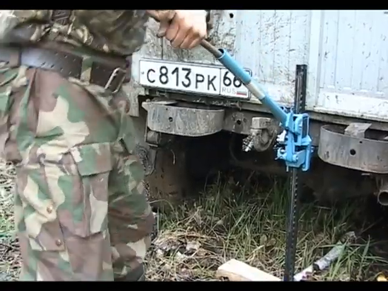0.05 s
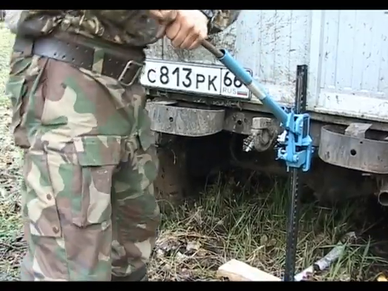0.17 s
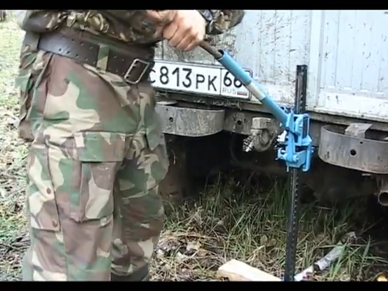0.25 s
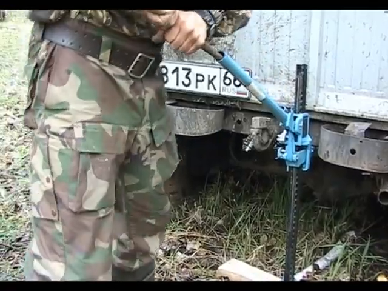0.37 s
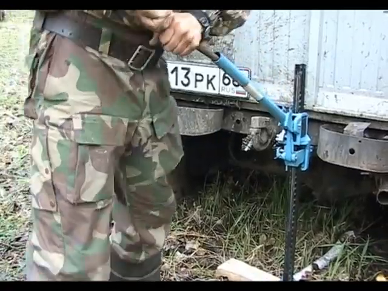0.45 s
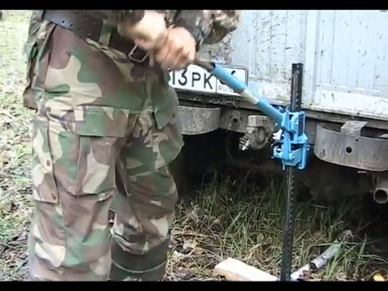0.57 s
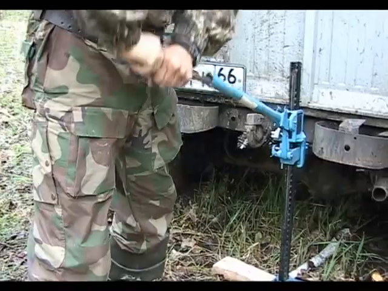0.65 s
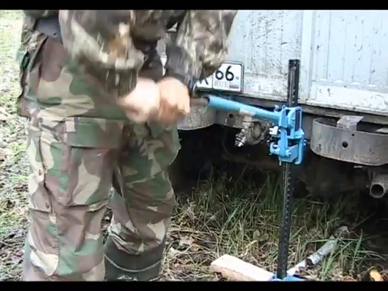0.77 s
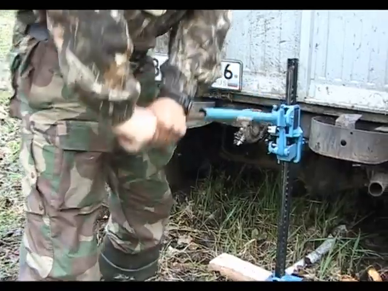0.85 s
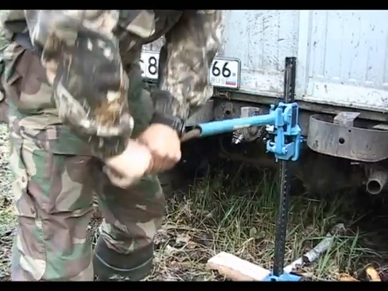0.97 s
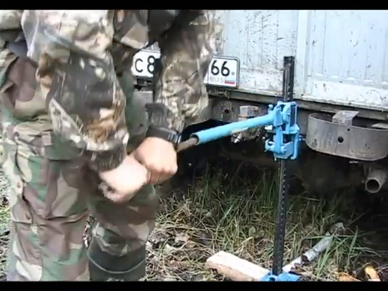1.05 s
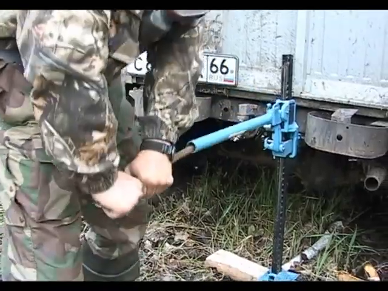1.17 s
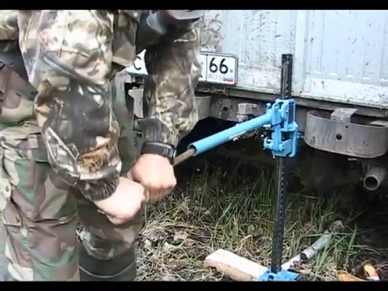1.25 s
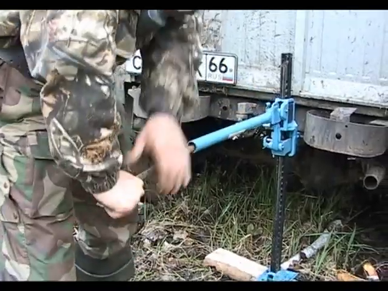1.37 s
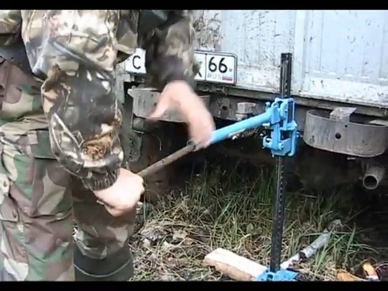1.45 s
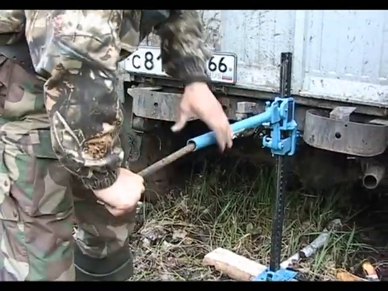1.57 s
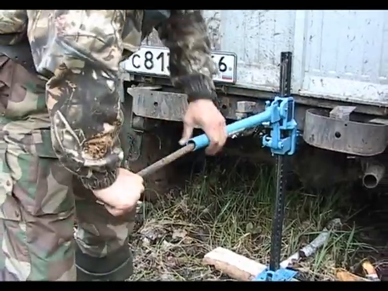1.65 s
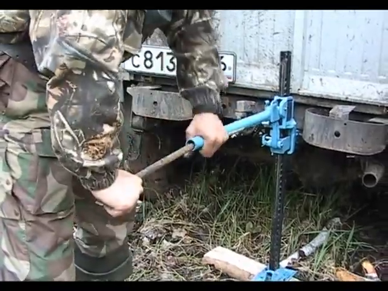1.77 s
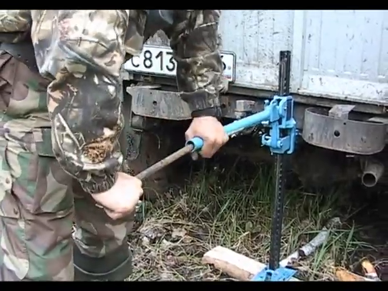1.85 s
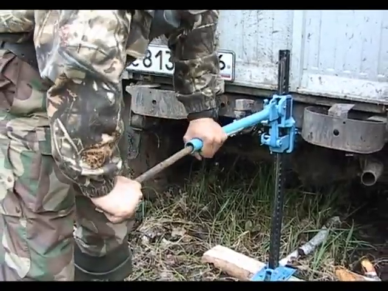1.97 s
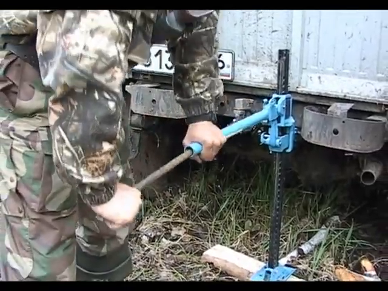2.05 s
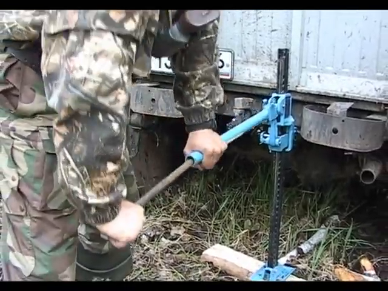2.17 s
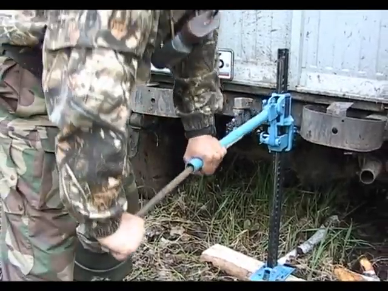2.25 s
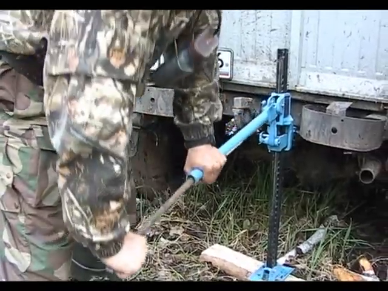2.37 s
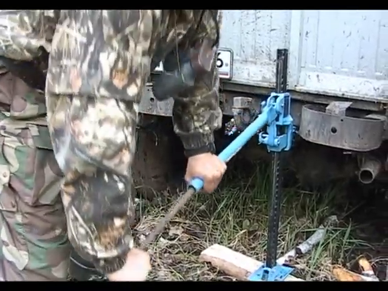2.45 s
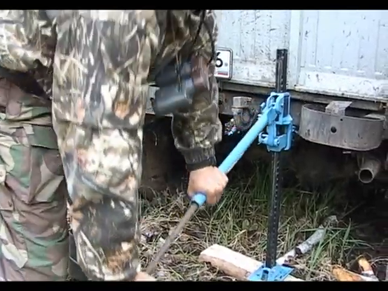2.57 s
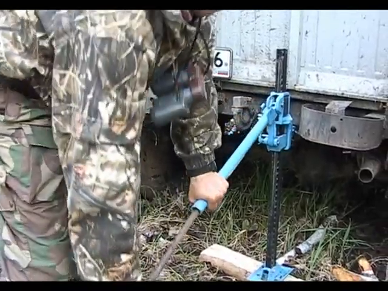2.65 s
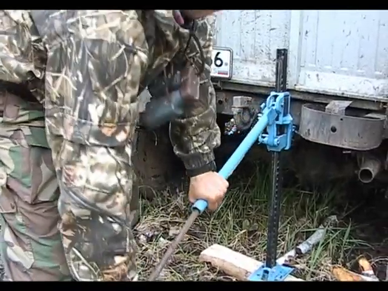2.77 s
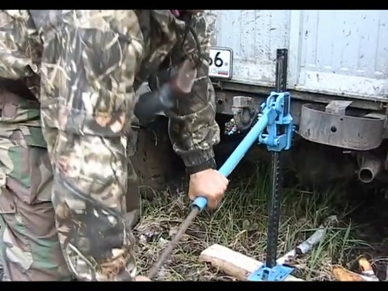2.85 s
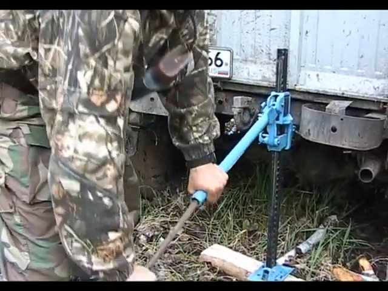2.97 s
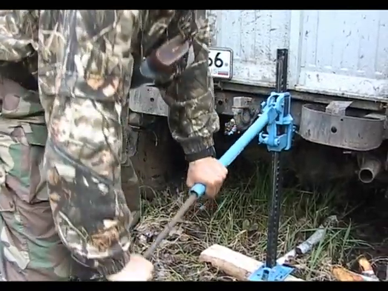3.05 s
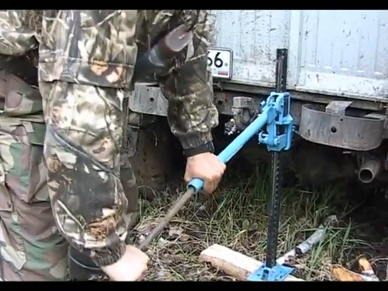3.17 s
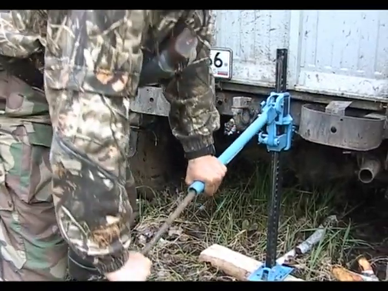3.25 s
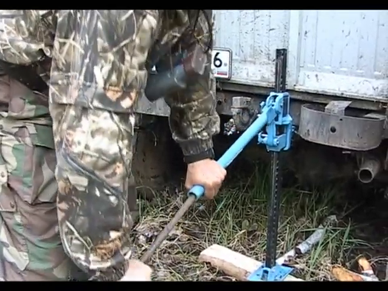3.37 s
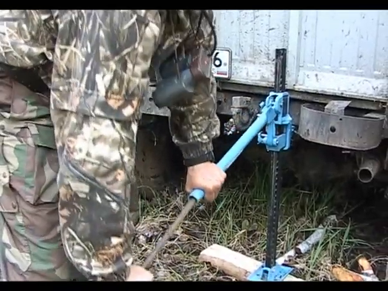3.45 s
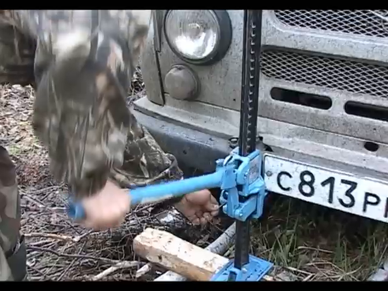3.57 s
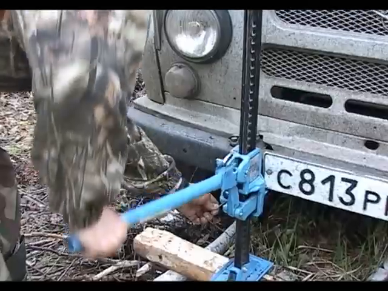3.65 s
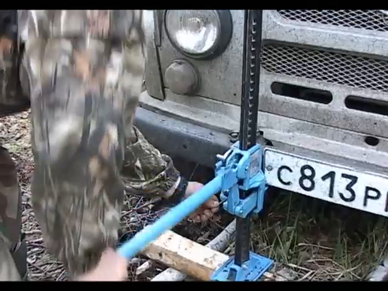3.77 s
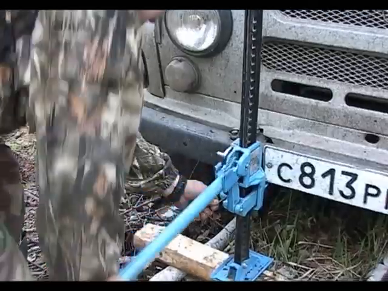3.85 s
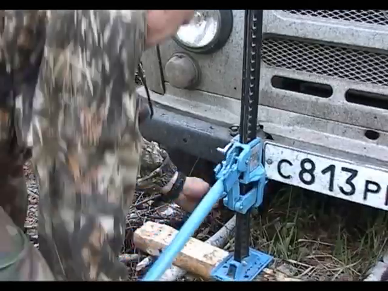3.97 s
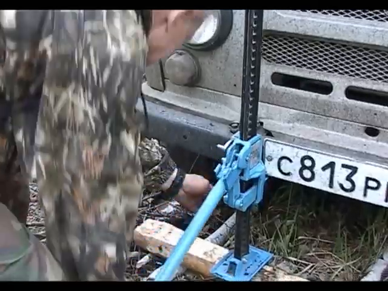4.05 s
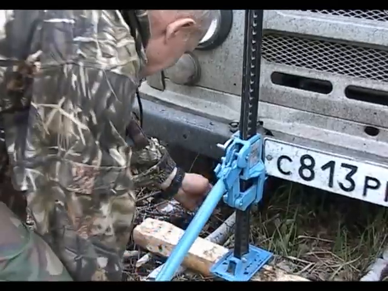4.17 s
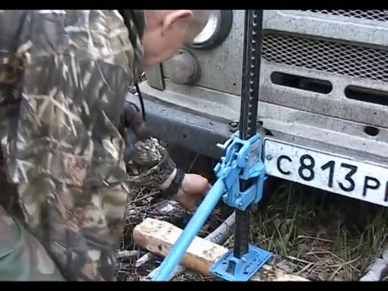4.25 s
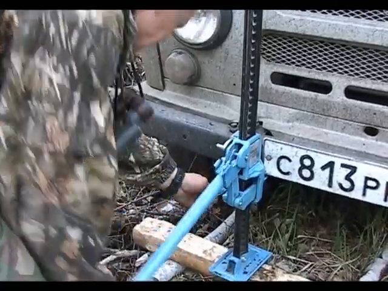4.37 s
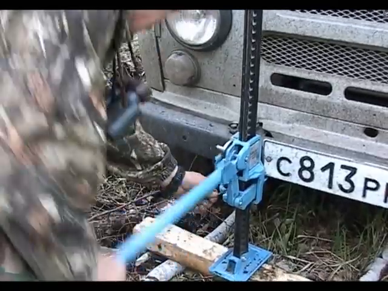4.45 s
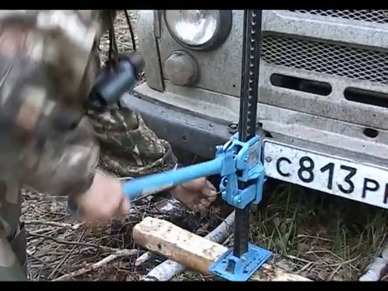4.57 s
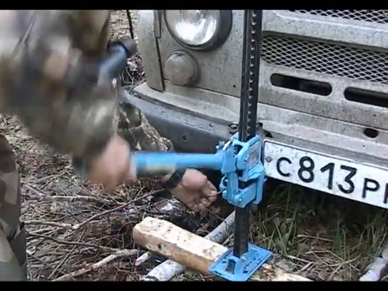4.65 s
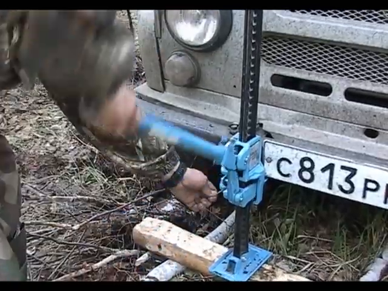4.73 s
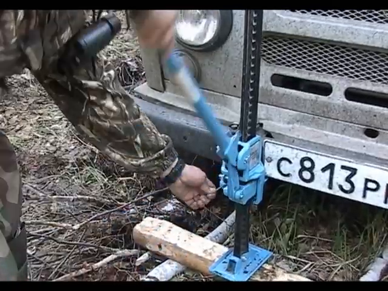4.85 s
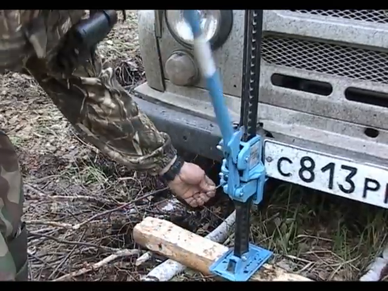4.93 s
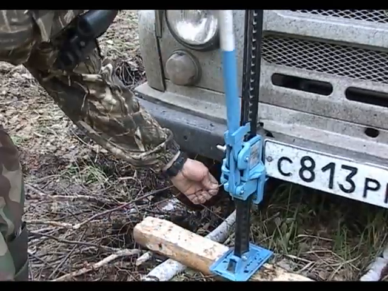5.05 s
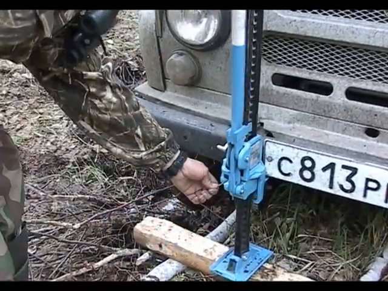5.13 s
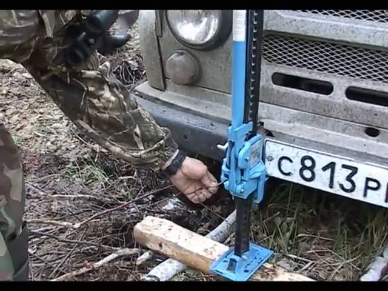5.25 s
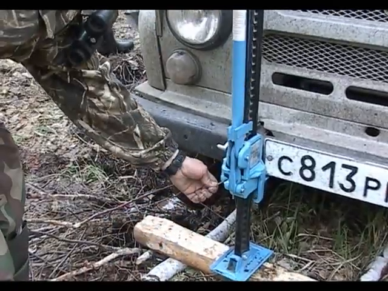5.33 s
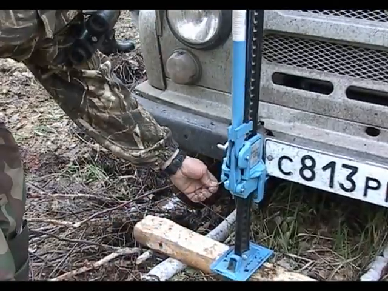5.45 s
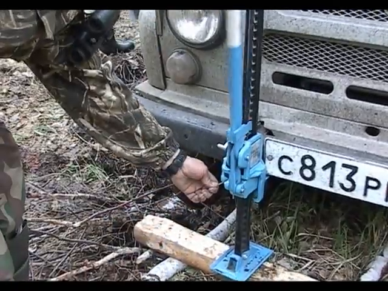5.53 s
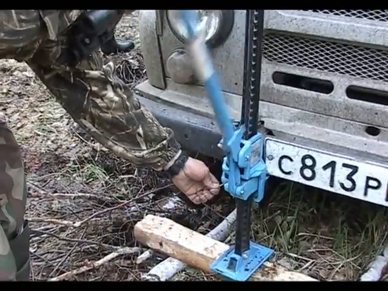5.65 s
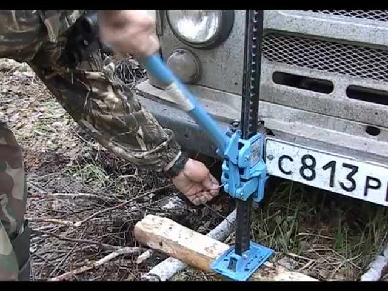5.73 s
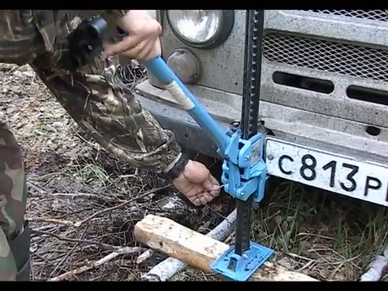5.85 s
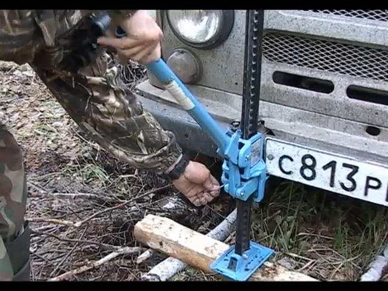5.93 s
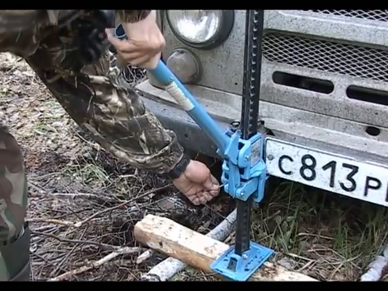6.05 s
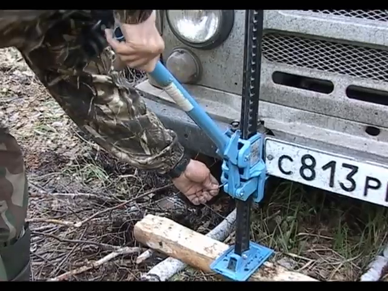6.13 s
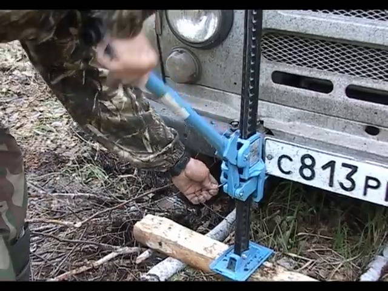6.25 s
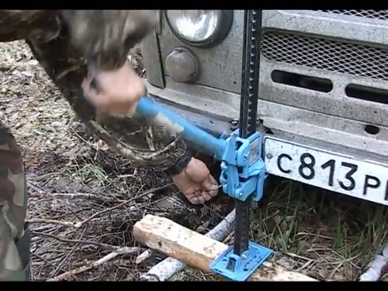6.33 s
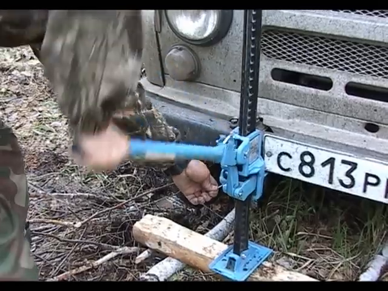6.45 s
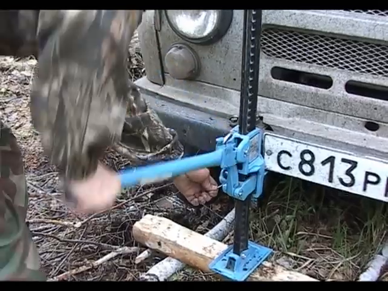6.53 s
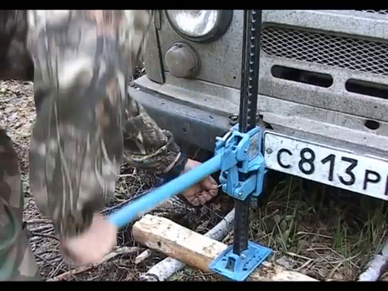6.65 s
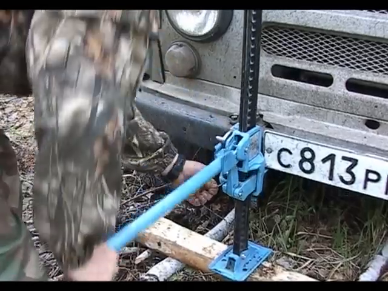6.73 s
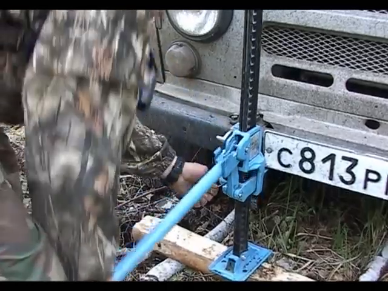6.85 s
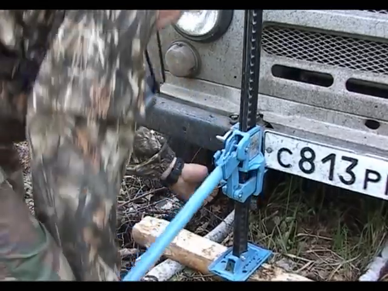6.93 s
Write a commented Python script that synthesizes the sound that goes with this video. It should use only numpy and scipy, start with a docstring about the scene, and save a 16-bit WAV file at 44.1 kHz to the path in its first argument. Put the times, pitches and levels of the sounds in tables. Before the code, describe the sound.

Close by, in a quiet outdoor spot, soft rustling and scraping of heavy fabric comes first, dotted with small ticks. Then a steel lifting jack is worked by its handle, its pins snapping into the rack in sharp, uneven clacks with small rattles and a short metallic ring. The hardest knocks overload the microphone slightly. Distant birds are barely audible over a light hiss.

```python
"""Pumping a steel rack jack

Beside a truck at the edge of a wood, stiff clothes swish and crackle by friction as the handle is
leaned on. Then pins snap into the rack and the handle knocks in its socket: each impact excites the
modes of the steel, and the rack bar and the truck's sheet metal ring on. Far birds whistle over a
quiet hiss. The loudest knocks overload the input."""
import sys
import numpy as np
from scipy import signal
from scipy.fft import rfft, irfft
from scipy.io import wavfile
from scipy.ndimage import uniform_filter1d

SR = 44100
rng = np.random.default_rng(int(sys.argv[2]) if len(sys.argv) > 2 else 0)


def materialize(psi):
    """Save the field psi as 16-bit PCM at rate SR to the path in sys.argv[1].

    A 1-D psi becomes a single channel; in a 2-D psi each row is a channel.
    """
    bounded = np.clip(np.atleast_2d(psi).T, -1, 1)
    quanta = np.round(bounded * 32767).astype(np.int16)
    wavfile.write(sys.argv[1], SR, quanta)


N = 308418

# movements of body, clothes and boots: t/s, length/s, swish level/dB, rub level/dB
MOVEMENTS = [(0, 0.21, -53.5, -53), (0.096, 0.27, -38.5, -66), (0.255, 0.25, -45, -59),
             (0.59, 0.16, -50.5, -76), (0.708, 0.63, -49, -58.5), (1.313, 0.76, -43.5, -50.5),
             (1.515, 0.13, -43, -40.5), (1.62, 0.13, -36.5, -42.5), (1.676, 0.26, -42, -45),
             (2.528, 0.51, -45, -78), (2.713, 0.35, -46.5, -48), (3.016, 0.33, -48, -55.5),
             (3.314, 0.19, -51, -78), (4.827, 0.54, -58, -44.5), (5.341, 0.14, -51, -60),
             (5.534, 0.25, -59, -44)]
# hands sliding on the handle: t/s, length/s, level/dB
HAND_SLIDES = [(0.25, 0.39, -47), (1.11, 0.12, -43), (1.18, 0.19, -49.5), (2.815, 0.14, -44.5),
               (3.41, 0.17, -48.5), (5.338, 0.63, -51)]
# background hiss: t/s, level/dB
HISS_LEVEL = [(0, -49), (1.3, -55.5), (3.55, -54), (3.7, -56), (5.7, -64), (6.99, -59)]
# spectra of the four friction noises: f/Hz, relative density/dB
SWISH_SPECTRUM = [(2060, -8.5), (3500, -0.5), (6130, 0.5), (8350, 5), (13400, -4), (15600, -14),
                  (16300, -40)]
SCRAPE_SPECTRUM = [(700, 1), (1100, 1), (2000, 2.5), (3500, -3.5), (5000, -4), (7000, -14)]
RUB_SPECTRUM = [(25, -51), (60, -2), (120, -20.5), (220, 0), (330, -3), (430, -12.5), (580, 4), (750, -31),
                (1000, 0), (1500, -78)]
SLIDE_SPECTRUM = [(600, -4.5), (1100, 0), (2300, -2), (3300, -8.5), (6000, -13.5)]
# likeness of left and right noise: f/Hz, correlation
NOISE_CORRELATION = [(60, -1.44), (180, 1), (550, 0.26), (1650, 0.38), (4970, 0.42), (15000, 0.71)]
# direction of the clothes: t/s, left over right/dB
CLOTHES_BALANCE = [(0, -2.5), (3.5, -2), (3.7, 0.5), (6.99, -1)]
# snaps of cloth and twigs: t/s, relative level/dB, centre f/Hz
CLEAR_SNAPS = [(0.103, -20.5, 10600), (0.183, -19, 8500), (0.203, -25, 4500), (0.246, -24, 8500),
               (0.312, -15, 7800), (0.318, -22, 10000), (0.408, -19, 3950), (0.429, -21, 696),
               (0.468, -27, 8500), (0.5, -26, 7950), (0.52, -25, 7800), (0.82, -26, 3220),
               (0.944, -27, 1610), (1.141, -22.5, 2200), (1.151, -20, 1360), (1.209, -24, 1690),
               (1.444, -18, 8500), (1.455, -20, 10000), (1.475, -25, 8300), (1.668, -10, 7500),
               (1.812, -16.5, 1900), (1.814, -11, 5500), (1.836, -26, 412), (2.555, -24.5, 7500),
               (2.601, -20.5, 7040), (2.614, -16.5, 8000), (2.669, -20.5, 7340), (2.82, -29.5, 220),
               (2.915, -25, 400), (3.085, -31, 220), (3.2107, -23, 8510), (3.3335, -26, 8000),
               (3.3609, -26, 8210), (3.374, -22.5, 8500)]
# far birds, one contour for each whistle: t/s, f/Hz, level/dB
WHISTLES = [
    [(2.17, 2130, -79), (2.46, 2860, -53)],
    [(4.84, 4270, -69), (4.9, 4330, -53)],
    [(6.22, 4400, -61), (6.37, 4150, -73)],
]
# the load shifting on the jack's foot: t/s, peak level/dB, body near 1 kHz/dB, favoured f/Hz
FOOT_THUMPS = [(3.6304, -31.5, 4.5, 210), (4.131, -28.5, -3, 318), (4.92, -30.5, -4, 244),
               (5.6803, -32.5, 12, 244), (6.041, -40, -27, 334), (6.0925, -43, -26, 300),
               (6.1948, -41.5, 5, 380), (6.2368, -40, 0, 250)]
# pins and handle: t/s, peak level/dB, body near 1 kHz/dB, brightness near 4 kHz/dB,
# rattle decay time/ms, favoured f/Hz
STEEL_KNOCKS = [(3.6644, -29, -8, -4.5, 2.5, 3850), (3.841, -23, -4.5, 3, 1.3, 980),
                (3.874, -22, -13, 2, 6.7, 2330), (3.8809, -3.5, -11.5, 4, 1.9, 3760),
                (3.888, -12.5, -5, 2.5, 7.4, 2290), (4.129, -27.5, 4.5, -15, 2, 970),
                (4.514, -25.5, -5, -1.5, 2.3, 3800), (4.5574, -4, 2, -3, 2, 3720),
                (4.5687, -12.5, 15, 5.5, 4, 4860), (4.5931, -20, 22, 9, 7.2, 2230),
                (4.618, -21, 0.5, 1, 7.1, 1240), (4.649, -23.5, 11.5, -17, 4.4, 1670),
                (4.6905, -29.5, 23.5, -10, 1, 1370), (4.7524, -31, 13, 2.5, 12, 1920),
                (4.78, -14, -2.5, -6.5, 1.6, 940), (4.9286, -25.5, 12.5, 1.5, 8.4, 1750),
                (5.0211, -23, -3, -7, 4, 1390), (5.0308, -23.5, -7, 0.5, 2.7, 4860),
                (5.0863, -22.5, 4, 1, 7, 2950), (5.0955, -18, -0.5, -7, 6.9, 1330),
                (5.154, -37.5, 1, 13.5, 3.5, 1630), (5.176, -29, 22, -5, 3, 950),
                (5.236, -24.5, 1, -5.5, 3.4, 3920), (5.2673, -1, 0, -1, 1.1, 2790),
                (5.275, -18.5, 2, 1, 3.1, 3880), (5.2965, -18.5, 12.5, -21, 14, 1430),
                (5.489, -41, -13, 7, 1.8, 2010), (5.534, -26.5, 4, 2.5, 1.4, 7500),
                (5.5766, -27.5, 10.5, -4.5, 7.8, 3950), (5.603, -27.5, 7, -8, 2.3, 606),
                (5.6537, -25.5, -1, -32, 4.9, 1010), (5.726, -18, 5.5, 0, 2.5, 4170),
                (5.728, -22, -4, 3.5, 3.5, 4950), (5.7442, -25, 17, 9.5, 4.2, 1810),
                (5.754, -29.5, -8, 14, 9, 6250), (5.7793, -16.5, -1.5, 3, 12, 860),
                (5.8024, -7, 7.5, -1.5, 5.6, 1860), (5.816, -22.5, -1, 5.5, 2.9, 3830),
                (5.8946, -30, 21, -19, 1.7, 1010), (6.412, -34.5, 11.5, -13, 2.6, 1930),
                (6.606, -34.5, -8, 4, 5.1, 2170), (6.6134, -29, -4, -2.5, 3.4, 3900),
                (6.802, -28.5, -2, -3, 8.1, 1670), (6.813, -13.5, -4.5, 3.5, 6.4, 7070),
                (6.8247, -3, -8.5, 3, 1.9, 3740), (6.839, -17.5, 3, -1, 8.2, 2300)]
# clearest modes of jack and handle: f/Hz, relative level/dB, T60/s
CLEAR_MODES = [(113.6, 1, 0.24), (255.8, 1.5, 0.3), (509, -2.5, 0.32), (575.5, 10.5, 0.16), (674, 9, 0.058),
               (877, 5.5, 0.095), (955, 6, 0.052), (1314, 0.5, 0.092), (1486, -4.5, 0.16),
               (1840, 12, 0.037), (2003, -4.5, 0.14), (2586, 4, 0.058), (2750, 5.5, 0.025),
               (3744, 12, 0.019), (4080, 6, 0.051), (4840, -5, 0.096), (7120, 3, 0.055)]
# the dense modes between them: f/Hz, relative level/dB
DENSE_LEVEL = [(150, -10), (500, -4), (2000, -1), (4000, -3), (8000, 2.5), (16000, -8)]
# their typical decay: f/Hz, T60/s
DENSE_DECAY = [(200, 0.17), (700, 0.03), (2000, 0.042), (5000, 0.026), (14000, 0.041)]
# modes of the rack bar: f/Hz, gain/dB, T60 before the fade-out/s
BAR_MODES = [(1949, -80, 2.5), (2401, -82, 2), (2552, -78, 2.5), (3898, -88, 1.5), (4660, -84, .6),
             (7052, -86, 1.6), (7348, -82, 1.6)]
# reverberation of truck body and trees: f/Hz, T60/s
PANEL_DECAY = [(150, 1), (600, 0.4), (2000, 0.37), (5000, 0.32), (12000, 0.36)]

SCRAPE_FLOOR_DB, RUB_FLOOR_DB, SCRAPE_RE_SWISH_DB = -53.5, -56, -4.5
CRACKLES_PER_S, CRACKLE_DB = 180, -10
TUBE_SPACING_HZ, TUBE_RIPPLE_DB = 298, 5  # the hollow handle favours evenly spaced bands
TICK_COUNT, TICK_OVER_DB, TICK_SPREAD_DB = 260, 8, 3.5
TICK_S, SNAP_S, SNAP_CYCLES = 0.001, 0.0038, 3.3  # decay time: a base time plus a few periods
BASS_DB, BASS_PER_BODY, AIR_PER_BODY = -6.5, 0.93, 0.43  # more body: more bass, less top treble
TOP_DB, TOP_PER_BRIGHT, TOP_PER_PEAK = -1, 2.08, 0.3  # the highest modes follow brightness and force
THUMP_BASS_DB, THUMP_BRIGHT_DB, THUMP_MS = 9.5, 3, 2.2
RING_DB, RING_PER_PEAK, RING_WIDTH_HZ = 3.5, -0.42, 100  # favoured resonance; half-width at 1 kHz
PARTNER_DB, T60_SPREAD = -6.5, 0.28
PANELS_DB, PANELS_CORRELATION = -17, 0.73
OVERLOAD, SLOPE_LOSS = 0.35, [[0.2], [0.98]]  # knee; slope lost on positive peaks, left and right
CUTOFF_HZ = 15900


def gain_of(db):
    """Amplitude ratio of a level in decibels."""
    return 10 ** (np.asarray(db) / 20)


def unit_rms(x):
    """Normalisation to unit mean power."""
    return x / np.sqrt(np.mean(x ** 2) + 1e-20)


def curve_at(points, hz):
    """Interpolation on a logarithmic frequency axis."""
    f, value = np.transpose(points)
    return np.interp(np.log(hz + 1), np.log(f + 1), value)


def place(mix, start_s, sound, pan_db):
    """Adds a sound whose left-right level difference gives its direction."""
    part = mix[:, round(start_s * SR):][:, :sound.shape[-1]]
    part += gain_of([[pan_db / 2], [-pan_db / 2]]) * sound[..., :part.shape[1]]


def swell_power(rows):
    """Incoherent sources add in power; each rises quickly and fades more slowly."""
    t = np.arange(N) / SR
    return sum(gain_of(db) ** 2 * np.sin(np.pi * np.clip((t - s) / length, 0, 1) ** 0.69) ** 2
               for s, length, db in rows)


def friction_noise(spectrum, patchy_db, flicker_db):
    """Partly coherent stereo noise, modulated by drifting patches and a flicker common to all bands."""
    frames, hz = N // 128 + 5, np.fft.rfftfreq(512, 1 / SR)
    a, b, c, d, patches = rng.standard_normal((frames, 257, 5)).T
    patches = unit_rms(uniform_filter1d(uniform_filter1d(patches, 8, 0), 12, 1))
    flicker = unit_rms(uniform_filter1d(rng.standard_normal(frames), 3))
    alike = np.clip(curve_at(NOISE_CORRELATION, hz), -1, 1)[:, None]
    left = a + 1j * b
    bands = np.array([left, alike * left + np.sqrt(1 - alike ** 2) * (c + 1j * d)])
    bands *= gain_of(curve_at(spectrum, hz)[:, None] + patchy_db * patches + flicker_db * flicker)
    return unit_rms(signal.istft(bands, nperseg=512, noverlap=384)[1][:, :N])


def clothes():
    """Friction of cloth and hands radiates noise that swells over a background with each movement."""
    t = np.arange(N) / SR
    moving = swell_power([(s, length, db) for s, length, db, _ in MOVEMENTS])
    rubbing = swell_power([(s, length, db) for s, length, _, db in MOVEMENTS])
    swish = np.sqrt(gain_of(np.interp(t, *np.transpose(HISS_LEVEL))) ** 2 + moving)
    scrape = np.sqrt(gain_of(SCRAPE_FLOOR_DB) ** 2 + gain_of(SCRAPE_RE_SWISH_DB) ** 2 * moving)
    rub = np.sqrt(gain_of(RUB_FLOOR_DB) ** 2 + rubbing)
    clicks = gain_of(3.7 * np.minimum(rng.exponential(1, N), 4)) * (rng.random(N) < CRACKLES_PER_S / SR)
    crackle = unit_rms(signal.oaconvolve(clicks, gain_of(-60 * t[:800] / 0.006))[:N])  # T60 of 6 ms
    grain = unit_rms(1 + gain_of(CRACKLE_DB) * crackle)
    f = np.arange(300, 6000, 40)
    tube_db = curve_at(SLIDE_SPECTRUM, f) - TUBE_RIPPLE_DB * np.cos(2 * np.pi * f / TUBE_SPACING_HZ)
    mix = swish * grain * friction_noise(SWISH_SPECTRUM, patchy_db=2.94, flicker_db=0.72)
    mix += scrape * grain ** 0.16 * friction_noise(SCRAPE_SPECTRUM, 2.54, 0.67)
    mix += rub * friction_noise(RUB_SPECTRUM, 0.34, 1.0)
    mix += np.sqrt(swell_power(HAND_SLIDES)) * grain * friction_noise(np.transpose([f, tube_db]), 1.4, 1.8)
    mix += snaps(swish)
    thin = signal.lfilter(*signal.butter(2, 110, "high", fs=SR), mix)  # small things make no deep bass
    lean_db = np.interp(t, *np.transpose(CLOTHES_BALANCE)) / 2
    return thin * gain_of([lean_db, -lean_db])


def snaps(swish):
    """Transients of cloth and twigs are damped noise bands; small ticks crowd where the swish is loud."""
    out, t = np.zeros((2, N)), np.arange(1024) / SR
    f = np.fft.rfftfreq(1024, 1 / SR) + 1
    when, pitch, rarity = rng.random((TICK_COUNT, 3)).T
    at = np.searchsorted(np.cumsum(swish) / swish.sum(), when).clip(0, N - 1)
    tick_db = 20 * np.log10(swish[at]) + TICK_OVER_DB - TICK_SPREAD_DB * np.log(rarity + 0.0012)
    rows = np.vstack([np.transpose([at / SR, tick_db, 3500 * 3.2 ** pitch]), CLEAR_SNAPS])
    decays = np.repeat([TICK_S, SNAP_S], [TICK_COUNT, len(CLEAR_SNAPS)]) + SNAP_CYCLES / rows[:, 2]
    for (s, db, hz), decay_s, noise in zip(rows, decays, rng.standard_normal((len(rows), 1024))):
        band_db = -15 * min(hz / 2500, 1) * np.log2(f / hz) ** 2  # low snaps span more octaves
        band = unit_rms(irfft(rfft(noise) * gain_of(band_db)))
        burst = band * np.exp(-t / decay_s) * np.minimum(t / 0.0003, 1)
        place(out, s, gain_of(db) * 0.2 * burst, pan_db=-1.5)
    return out


def birds():
    """A whistle is a gliding pure tone; random frequency modulation makes it waver."""
    out = np.zeros((2, N))
    for contour in WHISTLES:
        s, hz, db = np.transpose(contour)
        t = np.arange(s[0], s[-1], 1 / SR)
        waver = 1 + 0.41 * uniform_filter1d(rng.standard_normal(len(t)), 300)
        tone = np.sin(2 * np.pi * np.cumsum(np.interp(t, s, hz) * waver) / SR)
        envelope = gain_of(np.interp(t, s, db)) * signal.windows.tukey(len(t), 0.3)
        place(out, s[0], envelope * tone, pan_db=0)
    return out


def impacts():
    """Harder impacts excite higher modes: knocks and thumps with their levels in four spectral ranges."""
    knocks = [(s, db, BASS_DB + BASS_PER_BODY * body, body, bright,
               TOP_DB + TOP_PER_BRIGHT * bright + TOP_PER_PEAK * db, ms, hz)
              for s, db, body, bright, ms, hz in STEEL_KNOCKS]
    thumps = [(s, db, THUMP_BASS_DB, body, THUMP_BRIGHT_DB,
               THUMP_BRIGHT_DB + TOP_PER_PEAK * db, THUMP_MS, hz)
              for s, db, body, hz in FOOT_THUMPS]
    return knocks + thumps


def steel_modes(t, dense_count):
    """Normal modes are damped sinusoids; loose parts split each clear mode in three, so it beats."""
    dense_hz = np.geomspace(150, 16000, dense_count) * rng.uniform(1.0, 1.01, dense_count)
    dense_t60 = curve_at(DENSE_DECAY, dense_hz) * np.exp(T60_SPREAD * rng.standard_normal(dense_count))
    dense = np.transpose([dense_hz, curve_at(DENSE_LEVEL, dense_hz), dense_t60])
    split = [np.multiply(CLEAR_MODES, [ratio, 1, 1]) + [0, db, 0]
             for ratio, db in ((1, 0.0062), (0.975, PARTNER_DB), (1.022, PARTNER_DB))]
    hz, db, t60 = np.vstack([dense, *split]).T[:, :, None]
    return gain_of(db - 60 * t / t60) * np.sin(2 * np.pi * hz * t)


def rattle(t, noise, decay_ms, peak_db):
    """The contact force is a decaying run of uneven small impacts whose treble ends sooner."""
    contacts = noise * abs(noise)
    fade = np.exp(-t * 1000 / decay_ms)
    dull = uniform_filter1d(contacts, 5)
    force = dull * fade + (contacts - dull) * fade ** 1.3
    force[30] = max(13.5 + peak_db / 4, 0)  # a hard blow lands one sharp contact almost at once
    return force


def jack():
    """Modal superposition: each rattle drives the modes of the steel with a new set of weights."""
    out, size, dense_count = np.zeros((2, N)), 16384, 300
    t, f = np.arange(size // 2) / SR, np.fft.rfftfreq(size, 1 / SR)
    modes, blows = steel_modes(t, dense_count), impacts()
    weights = rng.standard_normal((len(blows), len(modes)))
    clear = weights[:, dense_count:]
    weights[:, dense_count:] = np.sign(clear) * (0.45 + 0.5 * abs(clear))  # clear modes always sound
    mean_power = uniform_filter1d((abs(rfft(modes, size)) ** 2).sum(0), 90)
    noises = rng.standard_normal((len(blows), len(t)))
    for blow, response, noise in zip(blows, weights @ modes, noises):
        s, peak_db, bass, body, bright, top, decay_ms, ring_hz = blow
        spectrum = rfft(response, size) * rfft(rattle(t, noise, decay_ms, peak_db), size)
        # chance sets the fine detail only
        spectrum *= np.sqrt(mean_power / uniform_filter1d(abs(spectrum) ** 2, 90))
        # the place struck favours one resonance, more so in light knocks
        detuning = (f - ring_hz) / (RING_WIDTH_HZ * np.sqrt(1000 / ring_hz))
        spectrum *= 1 + gain_of(RING_DB + RING_PER_PEAK * peak_db) / (1 + 1j * detuning)
        colour = [(40, bass - 38), (90, bass - 9), (170, bass), (400, bass), (520, body), (1050, body),
                  (1400, 0), (2700, 0), (3400, bright), (5200, bright),
                  (7000, top), (10000, top), (15000, top - AIR_PER_BODY * body)]
        spectrum *= gain_of(curve_at(colour, f))
        aim = np.append(0.27 * unit_rms(uniform_filter1d(noise, 150)), 0)  # each mode favours one side
        knock = irfft(spectrum * [1 + aim, 1 - aim])[:, :len(t)]
        near_peak = np.sort(abs(knock.mean(0)))[-12]
        place(out, s, gain_of(peak_db) * knock / near_peak, pan_db=-0.8)
    return out


def rack_bar(knocks):
    """Resonance: the long bar answers each knock with faint, lightly damped tones, faded out by 1 s."""
    hz, db, t60 = np.transpose(BAR_MODES)[:, :, None]
    t = np.arange(SR) / SR
    response = (gain_of(db - 60 * t / t60) * np.sin(2 * np.pi * hz * t)).sum(0) * (1 - t ** 2)
    return signal.fftconvolve(knocks, response[None], axes=1)[:, :N]


def truck_panels(knocks):
    """Reverberation of sheet metal and trees: echoes of random sign, each band dying at its own rate."""
    taps = np.zeros((2, SR // 2))
    slots = np.arange(300, SR // 2 - 20, 20)
    at = slots + rng.integers(0, 20, (2, len(slots)))
    np.put_along_axis(taps, at, rng.choice([-1., 1.], at.shape), 1)
    taps[1] = PANELS_CORRELATION * taps[0] + np.sqrt(1 - PANELS_CORRELATION ** 2) * taps[1]
    hz, t, bands = signal.stft(taps, SR, nperseg=256)
    bands = bands * gain_of(-60 * t / curve_at(PANEL_DECAY, hz)[:, None])
    tail = signal.istft(bands, SR, nperseg=256)[1]
    return signal.fftconvolve(knocks, tail / np.linalg.norm(tail[0]), axes=1)[:, :N]


def scene():
    """Linear superposition of the jack, the ringing it excites, the clothes and the birds."""
    knocks = jack()
    return knocks + rack_bar(knocks) + gain_of(PANELS_DB) * truck_panels(knocks) + clothes() + birds()


def record(dry):
    """Asymmetric clipping rectifies loud knocks, leaving a low thud through the input coupling."""
    excess = np.clip(abs(dry) - OVERLOAD, 0, 1 - OVERLOAD)
    bent = np.clip(dry, -1, 1) - np.multiply(SLOPE_LOSS, excess)
    coupled = signal.lfilter(*signal.butter(2, 30, "high", fs=SR), np.clip(bent, -0.85, 0.85))
    low_pass = signal.firwin(255, CUTOFF_HZ, window=("kaiser", 9), fs=SR)
    return signal.oaconvolve(coupled, low_pass[None], "same")


dry = scene()
out = record(dry)
materialize(out)
```